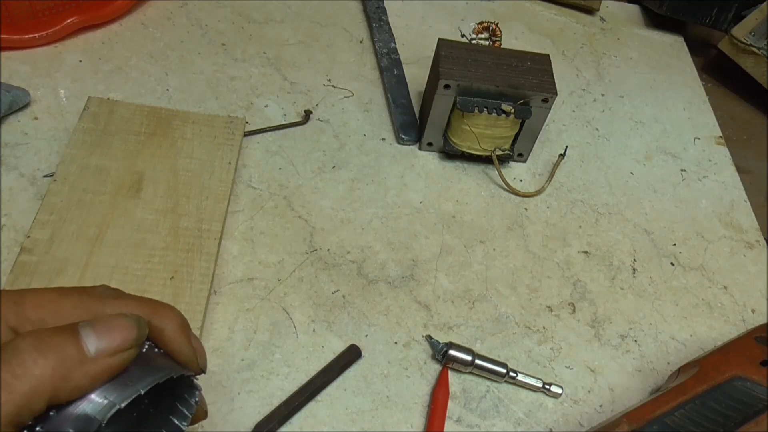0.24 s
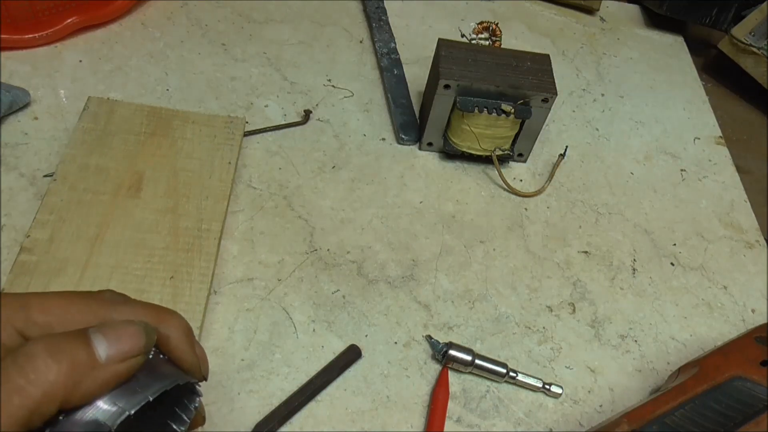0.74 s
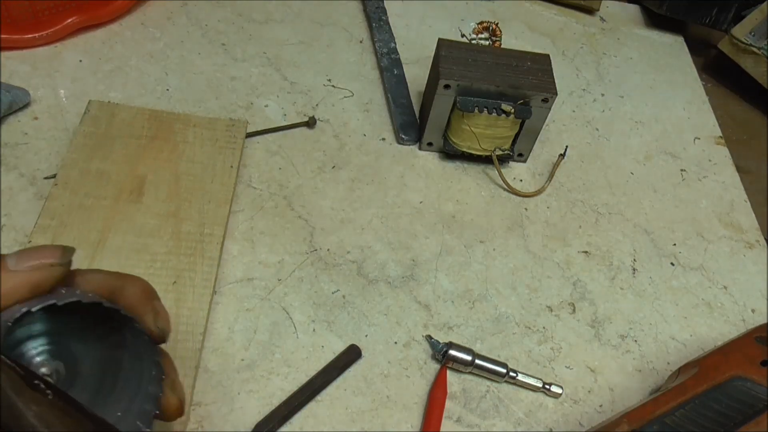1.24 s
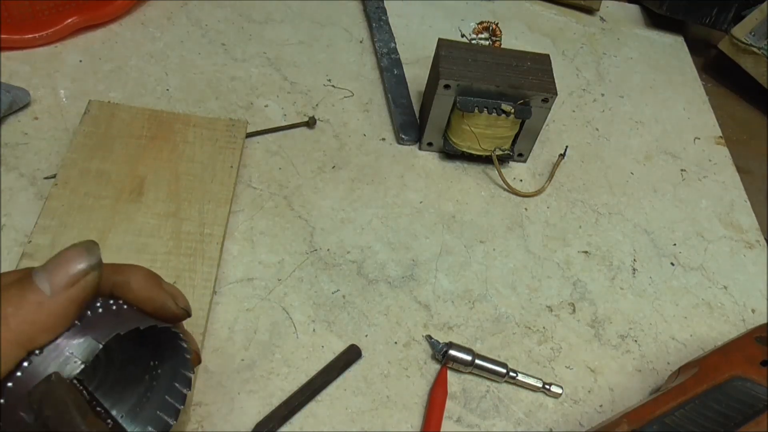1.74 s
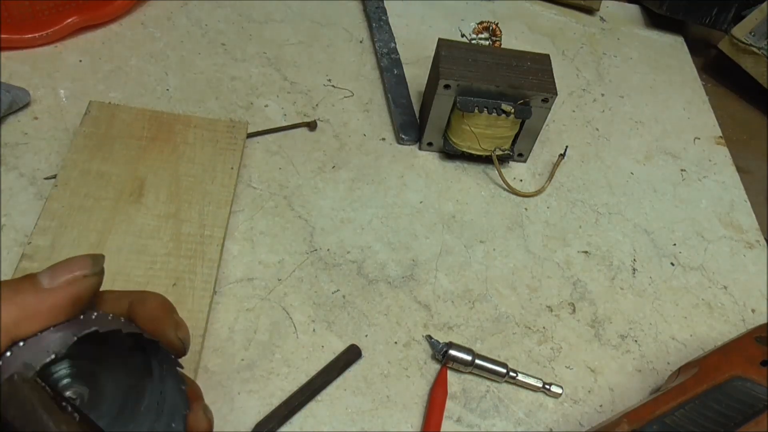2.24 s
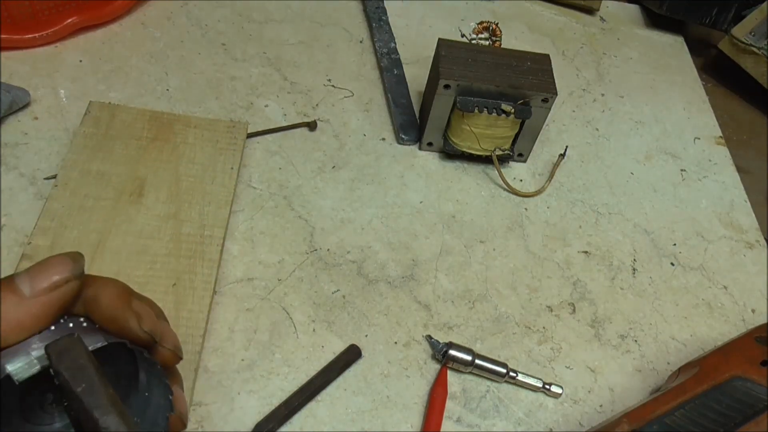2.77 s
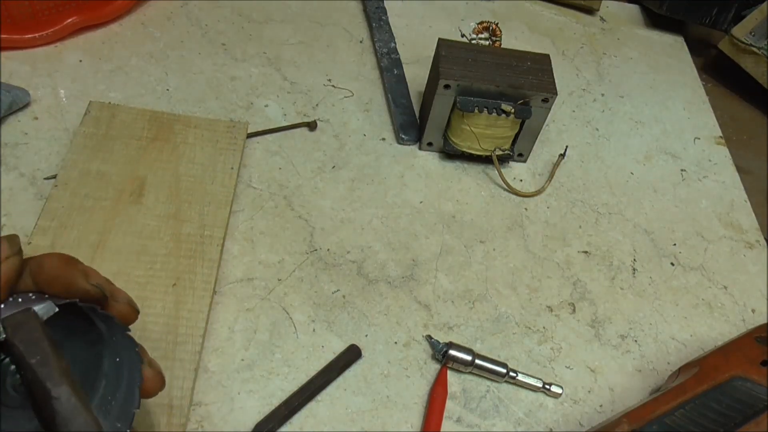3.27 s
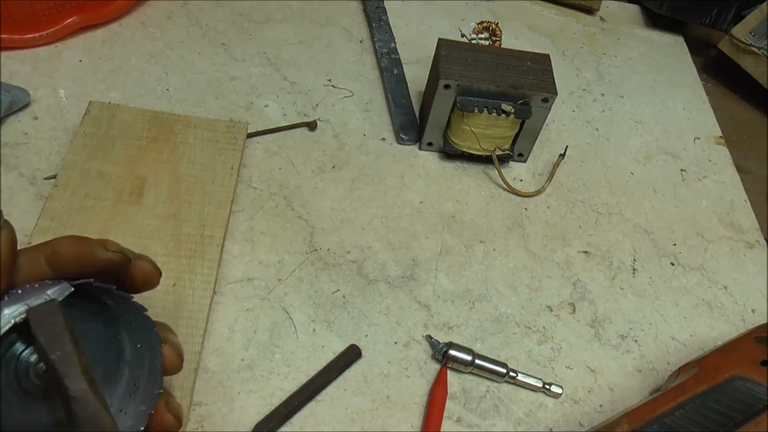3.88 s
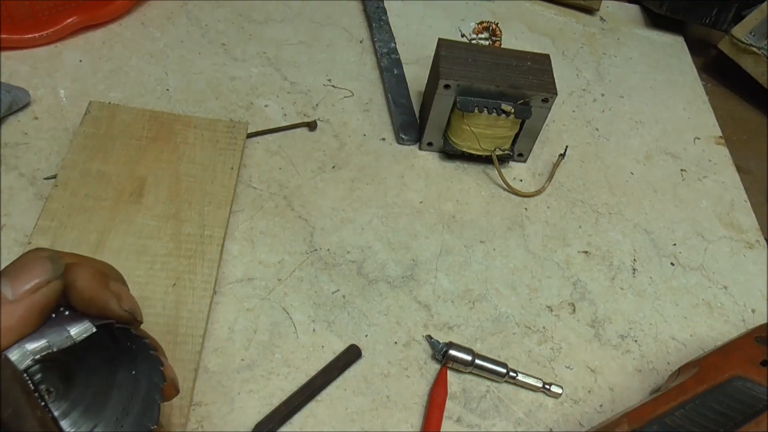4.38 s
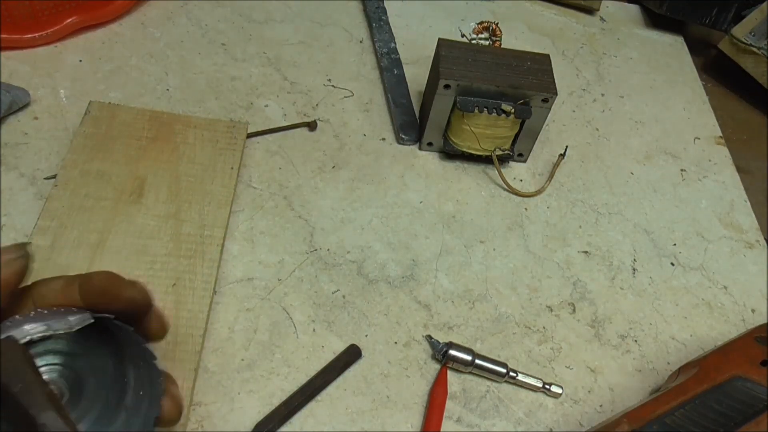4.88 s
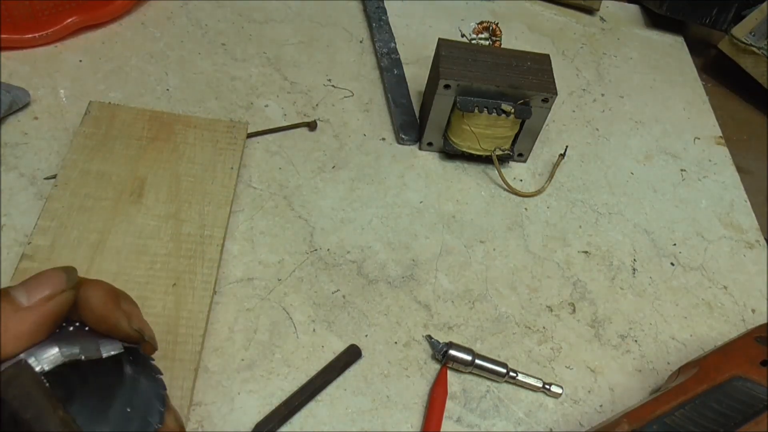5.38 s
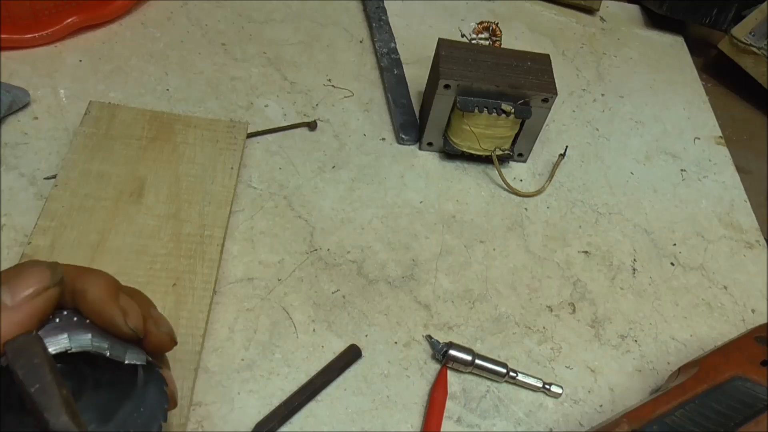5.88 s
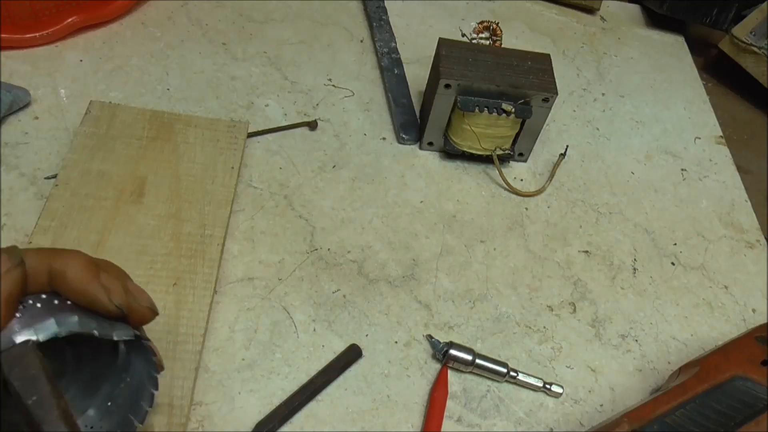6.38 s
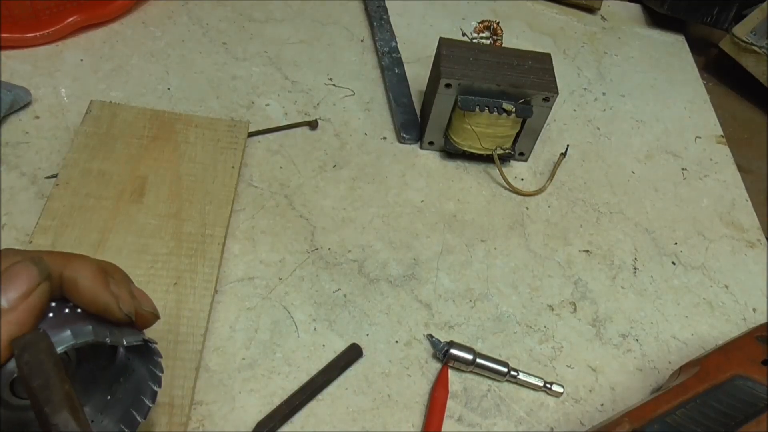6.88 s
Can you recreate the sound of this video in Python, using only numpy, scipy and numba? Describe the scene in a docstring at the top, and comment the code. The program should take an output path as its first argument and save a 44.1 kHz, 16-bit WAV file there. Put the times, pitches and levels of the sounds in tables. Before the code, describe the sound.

Thin sheet-metal tabs snap and crackle sharply as hands bend a small can with a tool, over a faint fan hum in a workshop.

```python
"""Hands bend the cut tabs of a thin metal can with a steel tool, left of a small camera on a workbench.
A fan whines and insects throb far off throughout, over the air of the room; faint tab snaps and scrapes
begin at once and a hard crack with a tool knock comes at 1.05 s. Palm bumps on the bench run from 1.26 to
5.56 s; snaps crowd from 2.6 s, peak again at 5.5 and 6.2 s and end near 6.9 s. Slips drive damped can modes
and a dry noise crack; the camera's limiter ducks the room after the loudest snaps."""
import sys
import numpy as np
from scipy import signal
from scipy.fft import rfft, irfft
from scipy.io import wavfile
from scipy.ndimage import uniform_filter1d, minimum_filter1d
from numba import njit

SR = 44100
rng = np.random.default_rng(int(sys.argv[2]) if len(sys.argv) > 2 else 0)


def unload_audio(sound):
    """Save the sound as a 16-bit wav file, at the path given as the first command line argument."""
    columns = np.transpose(np.atleast_2d(sound))
    # keep every value between -1 and 1, then stretch to whole-number steps
    steps = np.round(np.clip(columns, -1, 1) * 32767)
    wavfile.write(sys.argv[1], SR, steps.astype(np.int16))


N = 313992
LEAD_SAMPLES = 128  # faint rise of the zero-phase filter kept before each touch, faded in
TOUCH_RING_HZ = 4817  # strongest ring under scrapes and knocks


def undb(db):
    """Decibels to gain."""
    return 10 ** (np.asarray(db) / 20)


def level(x, db):
    """Scale to an rms level."""
    return x * undb(db) / np.sqrt(np.mean(x ** 2))


def peak(x, n):
    """Peak of x; n is unused."""
    return np.abs(x).max()


def drive_rms(x, n):
    """Spread of x over the n samples of the push."""
    return np.std(x[:n])


def walk(rate_hz):
    """Random levels held 1 / rate_hz seconds and slewed twice; spread near 1."""
    k = int(SR / rate_hz)
    steps = np.repeat(rng.standard_normal(N // k + 1), k)
    return 1.3 * uniform_filter1d(uniform_filter1d(steps, k), k)[:N]


def band(hz, width_hz, channels=1):
    """Noise in one resonance, rms 1."""
    b, a = signal.iirpeak(hz, hz / width_hz, SR)
    return level(signal.lfilter(b, a, rng.standard_normal((channels, N))), 0)


def add(out, x, s):
    """Mix x into out at s seconds."""
    i = int(s * SR)
    out[:, i:i + x.shape[1]] += x[:, :N - i]


def parts(db, lean_db, bright_db, body_db):
    """Levels of body, wall, rim, tab and edge from the strength, place and brightness of a touch."""
    # the edge thins faster than the tab as a touch dulls
    edge_db = 0.7 + 0.2 * bright_db
    wall_db = min(-lean_db, 0)
    rim_db = min(lean_db, 0)
    body_db = body_db + 0.75 * wall_db  # the body trails the wall
    return db + np.array([body_db, wall_db, rim_db, bright_db - edge_db, bright_db + edge_db])


def can(push, part_db, ring_hz, measure, free=1):
    """The push cracks and rings every part of the can; each touch point favours other modes."""
    # Modes by part (body, wall, rim, tab, edge). Each row: nominal frequency in Hz, relative level in dB,
    # nominal t60 in seconds.
    can_modes = [
        [(353, -2, 0.0074), (544, 2, 0.009)],
        [(1830, -18.5, 0.017), (2254, -6.5, 0.016), (2701, -1.5, 0.0083)],
        [(3833, -20, 0.023), (4187, 3.5, 0.011), (4557, 3.5, 0.0093), (4923, -10.5, 0.013)],
        [(7570, -1, 0.015), (8970, 7, 0.022)],
        [(12300, -6.5, 0.023)],
    ]
    # Band of each part. Each row: low edge in Hz, high edge in Hz.
    spans_hz = [(190, 1600), (1450, 3500), (3300, 5080), (5900, 10800), (10500, 16500)]
    # One value per part: left minus right in dB.
    pans_db = [0.5, 2.4, 2.5, 2.2, 3.5]
    # One value per part: level of the modes against the dry crack in dB.
    rings_db = [-37.5, -26.5, -19, -36.5, -20.5]
    # One value per part: decay time constant of the crack in ms.
    cracks_ms = [4.1, 1.6, 0.58, 2.7, 3.4]
    favoured_db, others_db = 8, 4  # gain of the mode nearest ring_hz; how far its neighbours sink
    twin_hz, twin_share = 170, 0.62  # spread and strength of each mode's twin in the dented sheet

    t, out = np.arange(1280) / SR, 0
    opposed = np.array([1, -1])
    for k, modes in enumerate(can_modes):
        hz, gain_db, t60 = np.transpose(modes)
        luck = rng.standard_normal((5, len(hz)))
        near = np.exp(-(np.log(hz / ring_hz) / .045) ** 2)
        # bending detunes the sheet
        hz = hz * (ring_hz / hz) ** near * (1 + 0.027 * luck[0] * (1 - near))
        other_db = gain_db - others_db * near.max() + 3.3 * luck[1]
        size = undb(rings_db[k] + favoured_db * near + other_db * (1 - near))
        phase = (np.pi * luck[2] + 0.059 * np.outer(opposed, luck[3]))[:, :, None]
        decay = np.exp(-np.log(1000) * t / (free * t60[:, None]))
        mode = np.sin(2 * np.pi * hz[:, None] * t + phase)
        twin = np.sin(2 * np.pi * (hz + twin_hz * luck[4])[:, None] * t - phase)
        ring = np.einsum("m,cmt->ct", size, decay * (mode + twin_share * twin))
        # countless damped modes of the hand-held sheet blur into a dry crack
        both, apart = rng.standard_normal((2, len(t))) * np.exp(-1000 * t / cracks_ms[k])
        crack = 0.11 * (both + 0.56 * np.outer(opposed, apart))
        crack[:, 0] = -1
        part_band = signal.butter(3, spans_hz[k], "band", fs=SR, output="sos")
        struck = signal.fftconvolve(np.pad(push, (LEAD_SAMPLES, 0))[None], ring + crack)
        part = signal.sosfiltfilt(part_band, struck)
        # body, wall and rim reach the right port a sample later
        part[1] = np.roll(part[1], int(k < 3))
        part[:, :LEAD_SAMPLES] *= np.hanning(2 * LEAD_SAMPLES)[:LEAD_SAMPLES]
        pan_db = pans_db[k] * np.array([[.5], [-.5]])
        size_now = measure(part.mean(axis=0)[LEAD_SAMPLES:], len(push))
        out = out + part * undb(part_db[k] + pan_db) / size_now
    return out


def snaps():
    """A tab lets go: a sharp tick, then a chatter of smaller slips; slow slips leave the sheet freer to ring."""
    # Each row: start in seconds, peak of the stronger of wall and rim in dB, strongest ring in Hz,
    # rim over wall in dB, brightness (treble over that peak) in dB.
    snap_rows = [(0.112, -54, 4800, 0, -9), (0.212, -52, 4800, -3, -9), (0.251, -49.5, 4740, 0, -16),
                 (0.349, -56.5, 4420, 2, -3), (0.383, -49, 4870, -3, -1.5), (0.4086, -32.5, 4820, 8, 6),
                 (0.439, -45.5, 4360, 1, 0), (0.5529, -30.5, 4760, 1, -0.5), (0.655, -51, 2220, -14, -4),
                 (0.746, -40, 3714, -5, -10.5), (0.9165, -53, 4870, 0, -2), (0.955, -52.5, 4400, 8, -8),
                 (1.0488, -7, 3870, 6, -9), (1.3815, -55, 4870, 5, -3), (1.4807, -29, 4980, 9.5, -18),
                 (1.613, -50.5, 4900, 6, -2.5), (1.6231, -42.5, 4930, 2, -21), (1.658, -52, 4870, 3, -15),
                 (1.6677, -38, 4740, -9, -23), (1.7733, -45, 4840, 11, -17), (1.8192, -36.5, 2650, -2, -9),
                 (1.9526, -53, 4840, -2, -9), (1.9676, -45.5, 2560, -4.5, -8.5), (2.025, -55, 4740, 0, -7),
                 (2.06, -56, 4420, 4, -7), (2.1305, -44, 4700, 8, -2), (2.6, -53.5, 4900, 0, -9),
                 (2.637, -35, 4870, 7, -17), (2.6458, -37.5, 2750, -10, -22), (2.7948, -35, 4700, 0.5, -2),
                 (2.8283, -23.5, 4750, 0.5, -13), (2.8461, -25, 4250, 7.5, -9), (2.9958, -47, 2640, 1, -20),
                 (3.5098, -48, 4840, 5, -12), (3.5485, -26.5, 4800, -1, -18.5),
                 (3.5803, -27, 4750, 0.5, -14), (3.6028, -30, 4800, 6, -4.5), (3.639, -24.5, 2180, -5, -17),
                 (3.6683, -25.5, 3940, -4, -23), (3.7732, -27.5, 2510, -7, -22),
                 (3.83, -41.5, 2770, -11, -12), (3.9116, -44.5, 4840, -4, -7),
                 (3.983, -26.5, 4800, 2, -9.5), (4.0422, -24, 4930, -2.5, -13.5),
                 (4.205, -19.5, 4950, 20.5, -6.5), (4.2131, -38, 4900, 3, -4),
                 (4.2436, -35, 4880, 2.5, -10.5), (4.3, -34, 4890, 15, -5.5), (4.3077, -23.5, 2690, 1, -12),
                 (4.622, -19.5, 4030, 0.5, -14), (4.6392, -49, 4660, 8, -6), (4.7215, -57, 4840, -2, -1),
                 (5.008, -56.5, 1780, -6, 4), (5.064, -27, 2760, -2, -17), (5.0966, -34, 4930, -1, 3),
                 (5.1676, -21.5, 2660, 1, -15), (5.235, -54, 4840, -3, -12), (5.3138, -42, 4450, 12, -13),
                 (5.359, -52.5, 4400, 2, -12), (5.4855, -11, 4200, 2, -9.5), (5.5967, -22.5, 2620, -5, -26),
                 (5.6463, -38.5, 2370, -7, -17), (5.694, -49, 4840, 4, -6), (5.7866, -30.5, 2730, -5, -21),
                 (5.861, -43, 4900, 4, -6), (5.8966, -28.5, 4840, 4.5, -18), (5.9241, -31, 4830, 12, -5),
                 (5.9324, -25, 4470, 1.5, -16.5), (6.1813, -7.5, 2860, -4.5, -10),
                 (6.1993, -8, 4560, 5.5, -1.5), (6.3054, -15.5, 4430, -4, 1.5), (6.3168, -24, 4900, 5, -10),
                 (6.334, -31, 4810, -5, -3), (6.359, -22, 4330, 1.5, -2.5), (6.4021, -31, 4450, -2, -10),
                 (6.479, -44, 4470, 1, -6), (6.4875, -39, 4470, 8, -7), (6.5098, -20, 2617, -7.5, -12),
                 (6.521, -30.5, 2830, -3, -3), (6.7408, -51.5, 4440, -6, -11), (6.774, -62, 4400, 0, 8),
                 (6.866, -55.5, 4380, -2, -10)]
    hard_db, hard_slip_ms, slip_ms_per_db = -20, 1.02, 0.01  # weaker snaps slip more slowly
    out, t_ms = np.zeros((2, N)), np.arange(512) / SR * 1000
    for s, db, ring_hz, lean_db, bright_db in snap_rows:
        slip_ms = max(hard_slip_ms - slip_ms_per_db * (db - hard_db), .2)
        slip_ms = slip_ms * undb(0.5 * rng.standard_normal())
        push = 0.05 * rng.laplace(size=len(t_ms)) * np.exp(-t_ms / slip_ms) * slip_ms ** 2
        push[0] = 1
        part_db = parts(db, lean_db, bright_db, body_db=-11)
        snap = can(push, part_db, ring_hz, peak, free=np.clip(slip_ms, .4, 2))
        add(out, snap, s - LEAD_SAMPLES / SR)
    return out


def scrapes():
    """The tool drags along a burred edge: dense uneven slips."""
    # Each row: start in seconds, length of the drag in ms, rms of the stronger of wall and rim in dB,
    # rim over wall in dB, brightness (treble over that level) in dB.
    scrape_rows = [(0.059, 34, -62.5, 3, -4), (0.498, 46, -57.5, 2, -9), (0.628, 48, -63, 14, -6),
                   (0.909, 42, -67.5, 1, -6), (1.649, 29, -53, 5, -20), (1.75, 61, -60, 5, -12),
                   (2.489, 27, -60.5, 9, -8), (2.54, 24, -63, 15, -8), (2.619, 12, -56, 4, -22),
                   (2.831, 21, -57, -13, -11), (2.972, 10.3, -49.5, 6, -15.5), (3.413, 21, -46.5, 7, -17.5),
                   (3.456, 39, -62.5, -2, -11), (3.605, 22, -57, 13, -10), (3.655, 18.5, -47, 2.5, -9.5),
                   (3.914, 33, -53.5, -1, -16), (4.115, 21.5, -51.5, 3, -14),
                   (4.335, 24.3, -49, 2.5, -18.5), (4.869, 22.6, -55.5, 1, -17),
                   (5.038, 21.5, -46.5, 9, -12), (5.069, 26, -53.5, 2, -9), (5.153, 49, -56, -3, -12),
                   (5.206, 20.7, -52, -4, -16.5), (5.292, 31, -48.5, 0, -15.5), (5.601, 51, -63.5, -8, -15),
                   (5.756, 47, -53, -3, -13), (6.011, 24, -53.5, -2.5, -17), (6.183, 13, -31, -3, -20),
                   (6.367, 17.4, -49.5, 0.5, -9), (6.51, 10.3, -49, 1, -11), (6.579, 42, -58, 1.5, -9)]
    out = np.zeros((2, N))
    for s, ms, db, lean_db, bright_db in scrape_rows:
        n = int(ms * SR / 1000)
        slips = rng.standard_normal(n) * undb(2.8 * rng.exponential(size=n))
        grip = undb(4.0 * np.repeat(rng.standard_normal(n // 128 + 1), 128)[:n])
        push = slips * grip * signal.windows.tukey(n, .3)
        part_db = parts(db, lean_db, bright_db, body_db=-2.5)
        add(out, can(push, part_db, TOUCH_RING_HZ, drive_rms), s - LEAD_SAMPLES / SR)
    return out


def knocks():
    """A blunt touch of the tool that shakes mostly the body of the can."""
    # Each row: start in seconds, peak of the body in dB.
    knock_rows = [(1.0489, -18), (2.8277, -35), (3.5801, -33), (3.983, -33), (4.3076, -34), (4.622, -29),
                  (5.4854, -17), (6.1804, -13), (6.3054, -21), (6.5099, -29)]
    # Body, wall, rim, tab, edge: level against the body in dB.
    knock_parts_db = [0, -12, -20, -30, -30]
    out = np.zeros((2, N))
    for s, db in knock_rows:
        knock = can(np.ones(1), db + np.array(knock_parts_db), TOUCH_RING_HZ, peak)
        add(out, knock, s - LEAD_SAMPLES / SR)
    return out


def bumps():
    """A soft rough thud of the palm on the bench whose pitch sags as the palm settles."""
    # Each row: start in seconds, level in dB.
    bump_rows = [(1.257, -58), (2.129, -61.5), (3.23, -56), (3.872, -60), (4.778, -53), (5.556, -54)]
    out, t = np.zeros((2, N)), np.arange(4096) / SR
    hz = 120 + 110 * np.exp(-t / 0.011)
    shape = (t / .012) * np.exp(1 - t / .012)
    bench_band = signal.butter(2, [90, 450], "band", fs=SR, output="sos")
    for s, db in bump_rows:
        bench = signal.sosfilt(bench_band, rng.standard_normal((2, len(t))))
        thud = np.sin(2 * np.pi * np.cumsum(hz) / SR) + level(bench, -5)
        add(out, undb(db) * shape * thud * undb([[-1.5], [1.5]]), s)
    return out


def insects():
    """A hiss of wing strokes that throbs and wanders in pitch: low noise shifted up to a moving centre."""
    # Each row: time in seconds, level before the throb in dB, band centre in Hz.
    insect_rows = [(0, -80, 9040), (1.049, -73.5, 8800), (1.15, -65, 9070), (1.5, -71, 9300),
                   (1.7, -77, 8900), (2.699, -73, 8400), (2.852, -106, 8500), (3.298, -79, 8700),
                   (3.5, -75, 9100), (5.2, -78, 9280), (5.698, -80, 9030), (7.12, -80, 9150)]
    throb_hz, throb_start_turns, throb_depth = 7.55, .34, .5
    s, db, hz = np.transpose(insect_rows)
    t = np.arange(N) / SR
    throb = 1 + throb_depth * np.sin(2 * np.pi * (throb_hz * t + throb_start_turns))
    centre = 2 * np.pi * np.cumsum(np.interp(t, s, hz)) / SR
    hiss = signal.sosfilt(signal.butter(2, 450, fs=SR, output="sos"), rng.standard_normal((2, N)))
    return level(hiss * np.sin(centre), 0) * throb * undb(np.interp(t, s, db))


def fan():
    """Blade tones, a steady core in a wavering skirt, louder on the right."""
    # Each row: frequency in Hz, nominal level in dB, skirt width in Hz.
    tone_rows = [(400.8, -65.5, 24), (710.6, -68.5, 19), (805, -67.5, 37), (1204.5, -58.5, 19),
                 (5760, -82, 34), (7500, -83, 58)]
    turn = 2 * np.pi * np.cumsum(1 + 0.001019 * walk(3)) / SR
    tones = 0
    for hz, db, width_hz in tone_rows:
        core = 1.045 * np.sin(hz * turn)
        skirt = 0.48 * band(hz, width_hz) + 0.25 * band(hz, width_hz, channels=2)
        tones = tones + undb(db) * (core + skirt)
    return tones * undb([[-1.8], [1.8]])


def room():
    """Air from the fan and distant bustle: half-octave-spaced bands that swell together and flicker alone."""
    # Each row: frequency in Hz, relative spectral level in dB.
    spectrum_rows = [(25, -35.5), (127, -18.5), (285, -15), (600, -10), (1000, -10), (1800, -8.5),
                     (2200, -19.5), (2900, -22.5), (3500, -36.5), (4500, -23), (5200, -35.5), (7200, -27),
                     (8000, -34.5), (16000, -38)]
    # Each row: frequency in Hz, left-right likeness from 0 to 1.
    like_rows = [(60, 0.18), (1300, 0.7), (3000, 0.32), (15000, 0.29)]
    # Each row: frequency in Hz, left minus right in dB.
    pan_rows = [(100, -0.8), (700, 0.5), (1300, -3.5), (2400, -5), (4400, 0.5)]
    log_f = np.log(np.arange(N // 2 + 1) * SR / N + 1)

    def curve(rows):
        """Interpolate a table over log frequency."""
        hz, value = np.transpose(rows)
        return np.interp(log_f, np.log(hz), value)

    like, pan_db = np.clip(curve(like_rows), 0, 1), curve(pan_rows)
    mid, side = rfft(rng.standard_normal((2, N)))
    pair = np.sqrt(1 + like) * mid + np.sqrt(1 - like) * side * np.array([[1], [-1]])
    pair = pair * undb(curve(spectrum_rows) + np.array([pan_db, -pan_db]) / 2)
    out, swell = 0, walk(0.32)
    half_octave = np.log(2) / 2
    for centre in np.log(25) + half_octave * np.arange(20):
        share = np.clip(1 - np.abs(log_f - centre) / half_octave, 0, 1)
        out = out + irfft(pair * share, N) * undb(swell / 2 + 1.6 * walk(3.677))
    return level(out, -55.5)


def workshop_echo(metal):
    """Echo of the workshop: decaying dulled noise, silent for the first 3 ms."""
    echo_db, t60_s, dull_hz = -20, 0.12, 6400
    t = np.arange(int(.3 * SR)) / SR
    tail = rng.standard_normal((2, len(t))) * np.exp(-np.log(1000) * t / t60_s) * (t > .003)
    tail = signal.sosfilt(signal.butter(1, dull_hz, fs=SR, output="sos"), tail)
    tail = tail / np.sqrt(np.sum(tail ** 2) / 2)
    return undb(echo_db) * signal.fftconvolve(metal, tail, axes=1)[:, :N]


def scene():
    """The can with the echo of the workshop, over bumps and the steady sounds."""
    # the can sounds little below 130 Hz
    thin = signal.butter(2, 130, "high", fs=SR, output="sos")
    metal = signal.sosfilt(thin, snaps() + scrapes() + knocks())
    return metal + workshop_echo(metal) + bumps() + insects() + fan() + room()


@njit
def follow(x, keep):
    """Peak follower: jumps up, sinks slowly."""
    e, out = 0., np.empty(len(x))
    for i in range(len(x)):
        e = max(x[i], e * keep)
        out[i] = e
    return out


def record(dry):
    """The microphone drops the bass; a limiter on the short-term level lags the attack and holds; then the cut-off."""
    limit_db, hold_s, release_s, ratio = -36, 0.028, 0.062, 1.63
    smooth_s, top_hz = 0.012, 15700
    dry = signal.sosfilt(signal.butter(1, 40, "high", fs=SR, output="sos"), dry)
    share = 1 / (smooth_s * SR)
    power = signal.lfilter([share], [1, share - 1], np.mean(dry ** 2, axis=0))
    hold = int(hold_s * SR)
    # highest power over the hold time just past
    held = -minimum_filter1d(-power, hold, origin=(hold - 1) // 2)
    heard = follow(np.sqrt(held), np.exp(-1 / (release_s * SR)))
    gain = np.minimum(undb(limit_db) / (heard + 1e-9), 1) ** (1 - 1 / ratio)
    return signal.sosfilt(signal.ellip(7, .3, 70, top_hz, fs=SR, output="sos"), dry * gain)


dry = scene()
out = record(dry)
unload_audio(out)
```